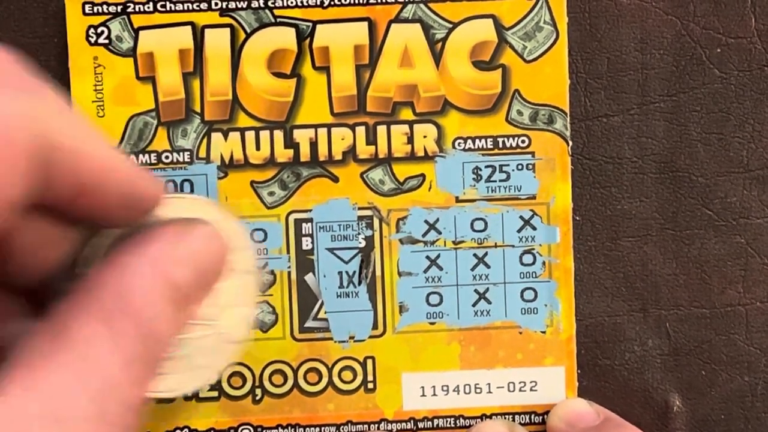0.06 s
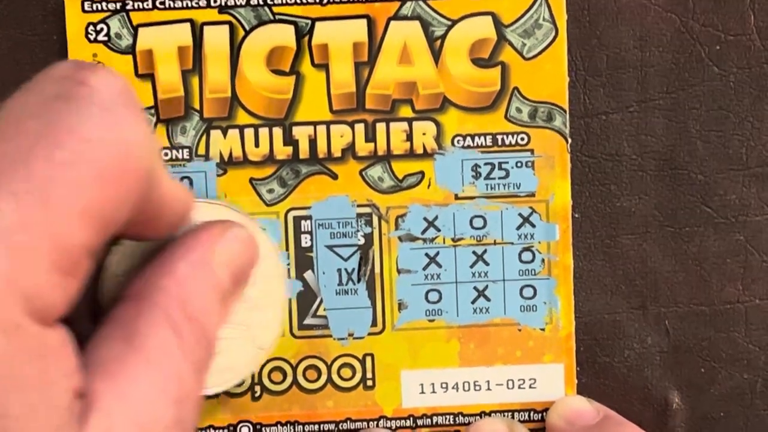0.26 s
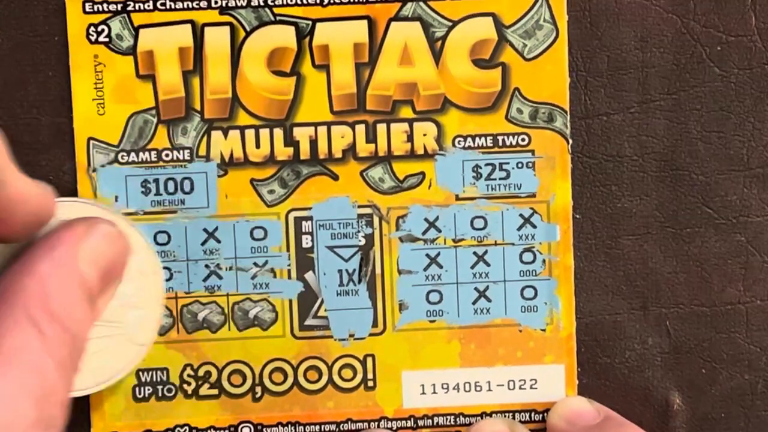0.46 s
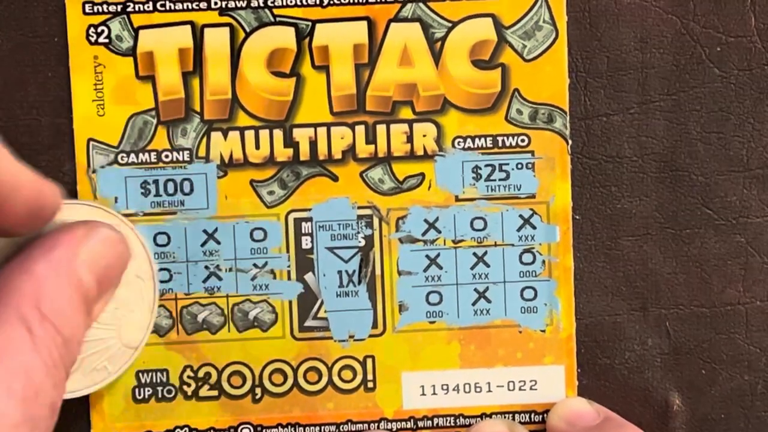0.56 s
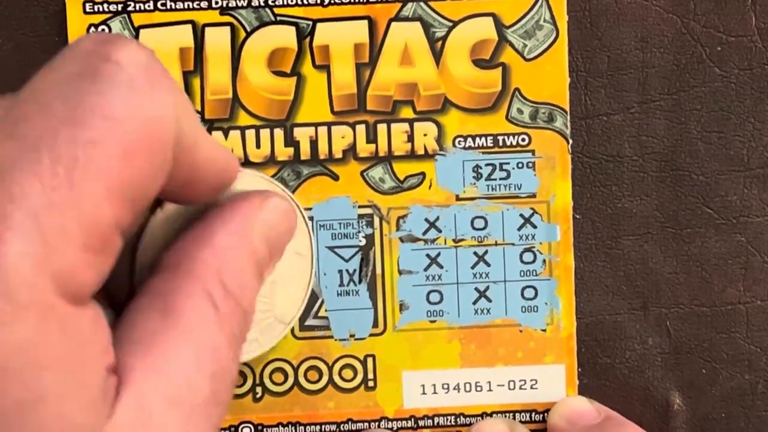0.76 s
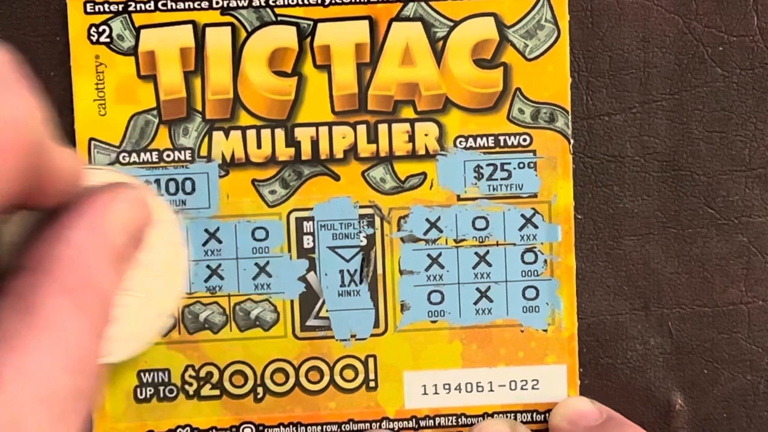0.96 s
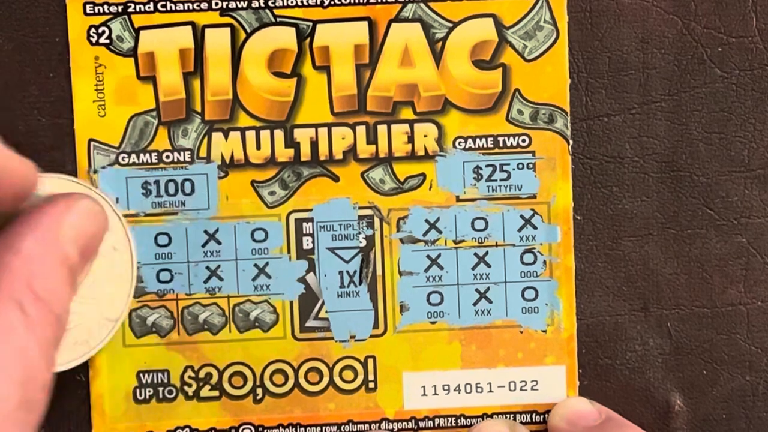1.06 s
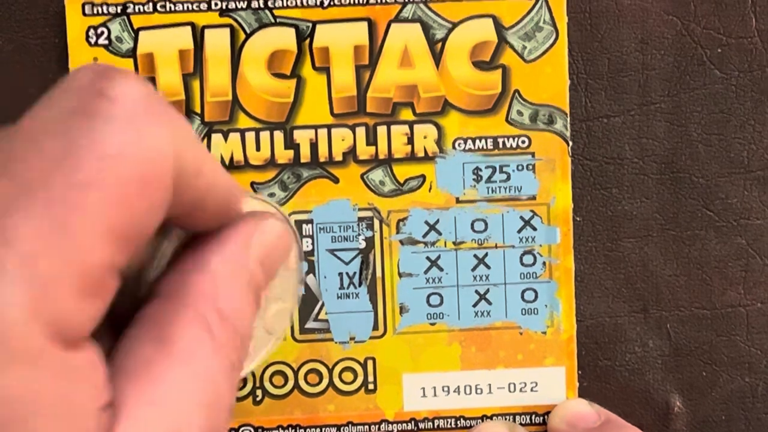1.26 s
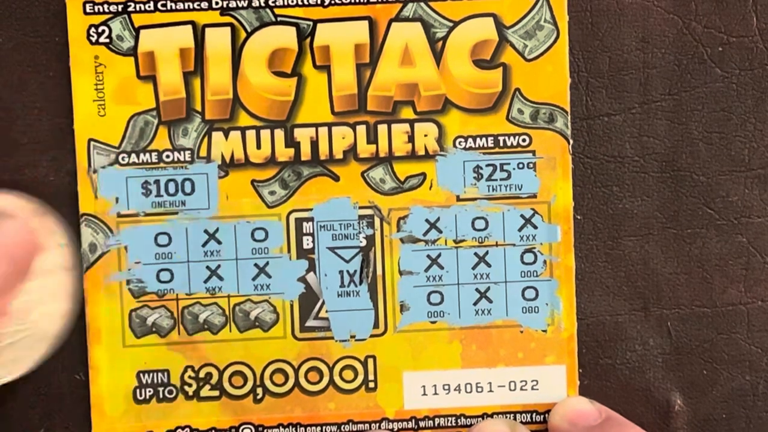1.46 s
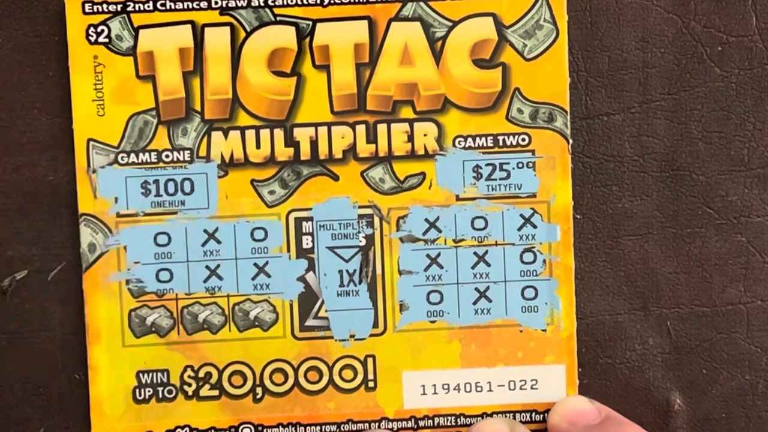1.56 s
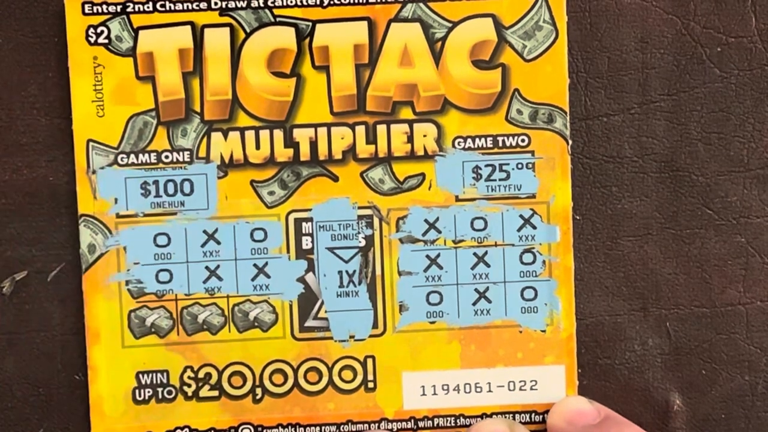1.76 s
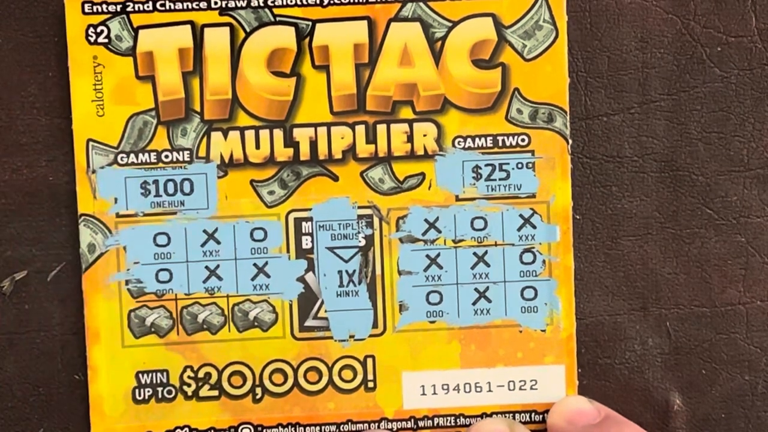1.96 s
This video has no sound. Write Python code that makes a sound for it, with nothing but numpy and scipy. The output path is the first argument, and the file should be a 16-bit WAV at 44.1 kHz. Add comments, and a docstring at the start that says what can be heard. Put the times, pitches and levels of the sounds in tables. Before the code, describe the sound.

A coin scrapes a paper ticket on a padded table in quick gritty strokes, three dull knocks landing between them, then a lighter knock and a faint slide away; close stereo microphone, small quiet room.

```python
"""A coin scratches a paper ticket on a padded table top in a small room: a soft, gritty rasp.
The scratch is dense random grains, filtered into rumble, rasp and hiss, with chirps and dry cracks on top.
Three dull knocks, where the coin lands, are force pulses spread into falling chirps, plus ringing table modes;
a lighter fourth knock follows as the coin drops off the ticket's edge and slides away.
Short noise bursts give the metal ticks; a short room tail and a quiet noise hush lie underneath."""
import sys
import numpy as np
from scipy import signal
from scipy.fft import rfft, irfft, next_fast_len
from scipy.io import wavfile

SR = 44100
rng = np.random.default_rng(int(sys.argv[2]) if len(sys.argv) > 2 else 0)


def materialize(psi):
    """Save the field psi as 16-bit PCM at rate SR to the path in sys.argv[1].

    A 1-D psi becomes a single channel; in a 2-D psi each row is a channel.
    """
    bounded = np.clip(np.atleast_2d(psi).T, -1, 1)
    quanta = np.round(bounded * 32767).astype(np.int16)
    wavfile.write(sys.argv[1], SR, quanta)


N = 88420
SIZE = next_fast_len(N + SR // 2)  # padded, so that filter tails do not wrap around
HZ = np.maximum(np.arange(SIZE // 2 + 1) * SR / SIZE, 1)
T = np.arange(N) / SR

# Slides of the coin: start t/s, end t/s, attack t/s, release t/s,
# rumble level/dB, rasp level/dB, hiss level/dB
STROKES = [(-.03, 0.159, .02, 0.09, -51.5, -57, -59.5), (0.127, 0.31, 0.0074, 0.14, -38, -50.5, -57),
           (0.244, 0.508, 0.064, 0.085, -47, -45.5, -49.5), (0.394, 0.529, 0.088, 0.038, -45.5, -47, -63),
           (0.74, 0.875, 0.013, 0.048, -38, -55.5, -64), (0.836, 0.991, 0.064, 0.059, -43.5, -50, -49.5),
           (0.928, 1.1, 0.023, 0.073, -42, -53, -59), (1.017, 1.062, 0.0033, 0.026, -55, -48, -56.5),
           (1.127, 1.153, 0.013, 0.011, -42.5, -62, -67), (1.263, 1.427, 0.0084, 0.024, -39.5, -47.5, -58),
           (1.374, 1.487, .03, .015, -43, -46.5, -56.5), (1.434, 1.469, 0.013, 0.014, -58, -42, -41.5),
           (1.47, 1.767, .11, .11, -61.5, -59, -58.5)]
# Colours of the sliding contact, shape only: f/Hz, level/dB (per Hz)
RUMBLE = [(30, -24), (70, -4), (105, -7), (138, 1), (175, -11), (280, -4), (430, -13), (600, -24.5),
          (1200, -58)]
RASP = [(200, -21.5), (500, -3), (700, -0.5), (890, 6.5), (1250, 3), (1550, 2.5), (1950, -3.5), (2300, -6),
        (3300, -20), (6000, -34)]
HISS = [(1000, -1), (2800, 5.5), (3400, -0.5), (4300, 1.5), (4750, -2), (5500, -1), (6400, 0.5),
        (7800, -3.5), (9500, -3), (11200, -6), (12500, -14), (16000, -6)]
# Resonances of the coin's rim: f/Hz, width f/Hz, level/dB
COIN_RINGS = [(4140, 85, -2), (4550, 420, -3.5), (6200, 58, -16.5), (7060, 100, -5), (8610, 117, 5)]
# Modes of the table top, also rung by the knocks: f/Hz, level/dB, t60 t/s
TABLE_MODES = [(136.6, -53.5, 0.31), (207, -66.5, 0.59), (279.6, -50, 0.32), (332.3, -33, 0.096),
               (431.5, -53, 0.046), (619.6, -43, 0.12), (720, -56, 0.12), (882, -41, 0.1),
               (1069, -42.5, 0.086), (1433, -50.5, 0.067), (1518, -51, 0.16), (2174, -47, 0.049),
               (2355, -37, 0.023), (2765, -47.5, 0.036), (3870, -50.5, 0.045)]
JUDDER_HZ, JUDDER_DB = 95, 1.73  # top rate and rms depth of the stick-slip judder
SLIDE_RING_DB, SLIDE_RING_Q = 0, 28  # how far and how sharply the table modes colour the scrape


def scraping():
    """Flakes break under the sliding coin: the table rumbles, the paper rasps, the rim hisses."""
    # the coin sticks and slips: a random wobble in level, shared by the three colours
    judder = from_db(JUDDER_DB * rms_one(cut(rng.standard_normal(N), JUDDER_HZ, "low")))

    power = np.zeros((3, N))  # overlapping strokes add in power
    for start, end, attack, release, rumble_db, rasp_db, hiss_db in STROKES:
        stroke = np.clip(np.minimum((T - start) / attack, (end - T) / release), 0, 1)
        power += (from_db([[rumble_db], [rasp_db], [hiss_db]]) * stroke) ** 2

    rim = 1 + sum(from_db(db) * resonance(hz, width) for hz, width, db in COIN_RINGS)
    modes = sum(resonance(hz, hz / SLIDE_RING_Q) for hz, _, _ in TABLE_MODES)
    table = 1 + from_db(SLIDE_RING_DB) * modes

    bodies = colour(RUMBLE) * table, colour(RASP) * table, colour(HISS) * rim
    scrape = np.zeros(N)
    for level, body in zip(np.sqrt(power), bodies):
        scrape += level * rms_one(through(grains() * judder, body))
    return scrape


GRAINS_PER_S, GRAIN_SPREAD_DB = 7000, 2.4  # flakes of coating that break away


def grains():
    """Dense tiny fractures of uneven size, at random times and of either sign."""
    sizes = from_db(GRAIN_SPREAD_DB * np.minimum(rng.exponential(1, N), 5))
    signs = rng.choice([-1, 1], N)
    return sizes * signs * (rng.random(N) < GRAINS_PER_S / SR)


# Chirps of the slipping rim: t/s, level/dB
SQUEAKS = [(.003, -53.5), (0.041, -57), (.079, -55)]
SQUEAK_HZ, SQUEAK_WIDTH_HZ = 5540, 620  # width of each of two stacked resonances
SQUEAK_S = 0.0061  # from the peak to 1/e


def squeaks():
    """Brief chirps of the rim on the smooth coating: narrow-band noise in bell-shaped swells."""
    envelope = sum(from_db(db) * np.exp(-((T - s) / SQUEAK_S) ** 2) for s, db in SQUEAKS)
    band = resonance(SQUEAK_HZ, SQUEAK_WIDTH_HZ) ** 2
    return envelope * rms_one(through(rng.standard_normal(N), band))


# Larger flakes snapping off: t/s, level/dB
SNAPS = [(.783, -50), (.99, -51), (1.016, -47.5), (1.084, -55.5), (1.3063, -45)]


def snaps():
    """Tiny dry cracks in the coating: decaying noise in the colour of the hiss."""
    return splashes(SNAPS, 0.027, HISS)


# Blows of the coin on the table: t/s, level/dB, hardness f/Hz (low-pass), bass cut f/Hz,
# mode ringing level/dB (on top of the blow), metal tick level/dB, tick top f/Hz
KNOCKS = [(0.1423, 16, 2690, 78, 0.5, -6.5, 17200), (0.7523, 14.5, 2040, 76, -1, -7.5, 14900),
          (1.2787, 16, 3130, 73.5, 1.5, -3.5, 8080), (1.4759, 8, 1520, 253, 5.5, -14, 10030)]
# Bending wave that a blow sends through the table top: f/Hz, level/dB
THUD = [(40, -41.5), (80, -11.5), (125, -10), (180, -17), (290, 2.5), (450, -1.5), (600, -16), (950, -9.5),
        (1250, -17), (1600, -13.5), (2400, -27), (3300, -35), (6000, -45), (9000, -51), (12000, -68)]
# Reflections from the table's edges and the walls: delay t/s, level/dB, top f/Hz
ECHOES = [(.00557, -15.5, 132), (.00708, -14, 6200), (0.0114, -12.5, 6000), (0.0201, -22, 790),
          (.03099, -19.5, 1260), (0.0322, -22.5, 1620), (.03944, -27, 2000)]
THUD_DB = 17  # added to the thud's colour


def knocks():
    """Each blow sends a bending wave through the table, which echoes and leaves its modes ringing."""
    _, level_db, _, _, ringing_db, *_ = np.transpose(KNOCKS)
    paths = 1  # the direct wave
    for delay_s, db, top_hz in ECHOES:
        delay = np.exp(-2j * np.pi * HZ * delay_s)
        paths = paths + from_db(db) * delay / (1 + 1j * HZ / top_hz)
    wave = through(blows(level_db), from_db(THUD_DB) * colour(THUD) * paths)

    drive = blows(level_db + ringing_db)
    ringing = sum(from_db(db) * ring(drive, hz, t60) for hz, db, t60 in TABLE_MODES)
    return wave + ringing


SPREAD_S, SPREAD_HZ = 0.00257, 305.6  # the wave's delay at this frequency; higher arrives sooner


def blows(levels_db):
    """Force pulses, softened by the paper and spread into falling chirps by the table top."""
    force = np.zeros(N)
    for db, (s, _, hard_hz, bass_hz, *_) in zip(levels_db, KNOCKS):
        soft_pulse = cut(click(s), hard_hz, "low")
        force += from_db(db) * cut(soft_pulse, bass_hz, "high")
    # delay falls with the square root of frequency
    spread = np.exp(-4j * np.pi * SPREAD_S * np.sqrt(SPREAD_HZ * HZ))
    return through(-force, spread)


# Ring of the coin and snap of the paper: f/Hz, level/dB
TICK = [(2000, 14), (3750, -11.5), (4400, -10.5), (5900, -1.5), (8000, -7), (10500, -9), (13000, -9.5),
        (16000, -2.5)]
TICK_DB, TICK_T60_S = -17.5, .05  # offset on each tick's level; decay by 60 dB


def ticks():
    """Noise splashes as metal meets paper, each with its own top as the coin meets it at its own angle."""
    total = np.zeros(N)
    for s, *_, db, top_hz in KNOCKS:
        splash = splashes([(s, db)], TICK_T60_S, TICK)
        total += cut(splash, top_hz, "low")
    return from_db(TICK_DB) * total


# Colour of the room tail: f/Hz, level/dB
ROOM_COLOUR = [(80, 2), (300, 3.4), (700, 9), (1500, 4.4), (3000, 2.6), (10000, 8.6)]
ROOM_DB, ROOM_T60_S, ROOM_BUILD_S = -21.5, .3, 0.001  # level before colouring, decay, build-up


def room(x):
    """Short diffuse tail of a furnished room: convolution with decaying noise."""
    decay = from_db(-60 * T / ROOM_T60_S)
    tail = rng.standard_normal(N) * decay * (1 - np.exp(-T / ROOM_BUILD_S))
    response = rfft(rms_one(tail) / np.sqrt(N), SIZE)  # unit energy
    return from_db(ROOM_DB) * through(x, response * colour(ROOM_COLOUR))


# Hush of the still room, shape only: f/Hz, level/dB (per Hz)
FLOOR = [(15, -30), (25, -4), (44, -5.5), (66, 0), (81, -14), (207, -7), (301, -12), (558, -15.5),
         (637, -19.5), (749, -14), (1180, -20.5), (2070, -21), (2300, -26), (7890, -36.5), (15000, -50)]
FLOOR_DB = -55.5  # before the ports


def still_room():
    """Two independent layers of steady coloured noise: the common hush and its stereo side."""
    noise = rng.standard_normal((2, N))
    return from_db(FLOOR_DB) * rms_one(through(noise, colour(FLOOR)))


# Difference between the two microphone ports: f/Hz, left minus right level/dB, left lead phase/rad
PORTS = [(190, 0, 0), (240, -2.1, -.1), (340, -1.8, -.1), (390, -4, -.1), (460, -2.3, .1), (540, -4.5, .1),
         (610, -.5, .5), (660, -1, -.2), (740, 2.2, -.6), (790, -4.5, -.7), (840, -8.5, 0), (900, -1, .7),
         (960, -1.5, .8), (1050, -3, .1), (1250, -.8, .3), (1400, -1.8, 0), (1900, -.3, .04),
         (3500, 0, .12), (7300, 0, -.1), (9000, 0, -1.1), (10400, 0, -1.7), (12500, 0, -2.7),
         (14000, 0, -2.85)]
PORT_HZ, PORT_WIDTH_HZ = 5020, 300  # a narrow resonance turns the phase of the left port


def ports(x):
    """The sound reaches each port with its own level and phase, half the difference on each side."""
    level = from_db(over_hz([(hz, db) for hz, db, _ in PORTS]) / 2)
    turn = np.exp(.5j * over_hz([(hz, radians) for hz, _, radians in PORTS]))
    all_pass = 1 - 2 * resonance(PORT_HZ, PORT_WIDTH_HZ)
    left = level * turn * all_pass
    right = 1 / (level * turn)
    return through(x, np.array([left, right]))


def splashes(hits, t60, spectrum):
    """Bursts of coloured noise that start at once and decay by 60 dB in t60 seconds."""
    envelope = sum((T >= s) * from_db(db - 60 * np.maximum(T - s, 0) / t60) for s, db in hits)
    body = colour(spectrum)
    unit_body = body / np.sqrt(np.mean(abs(body) ** 2))
    return through(envelope * rng.standard_normal(N), unit_body)


def click(s):
    """A unit click at a given time."""
    return 1. * (np.arange(N) == int(s * SR))


def ring(x, hz, t60):
    """A two-pole resonator: a unit click sets a decaying sine of about height 1 ringing."""
    radius = 10 ** (-3 / (t60 * SR))
    angle = 2 * np.pi * hz / SR
    feedback = [1, -2 * radius * np.cos(angle), radius ** 2]
    return signal.lfilter([0, np.sin(angle)], feedback, x + 1e-18)


def resonance(hz, width_hz):
    """Frequency response of one resonance, gain 1 on top."""
    return 1 / (1 + 1j * (HZ ** 2 - hz ** 2) / (HZ * width_hz))


def from_db(db):
    """Decibels to gain."""
    return 10 ** (np.asarray(db) / 20)


def rms_one(x):
    """Scale to rms 1."""
    return x / np.sqrt(np.mean(x ** 2) + 1e-20)


def over_hz(points):
    """Read a table on a log-frequency axis."""
    hz, value = np.transpose(points)
    return np.interp(np.log(HZ), np.log(hz), value)


def through(x, response):
    """Pass a sound through a frequency response."""
    return irfft(rfft(x, SIZE) * response, SIZE)[..., :N]


def colour(points):
    """Causal (minimum-phase) response with the given dB curve."""
    cepstrum = irfft(np.log(from_db(over_hz(points))), SIZE)[:SIZE // 2]
    return np.exp(rfft(2 * cepstrum, SIZE) - cepstrum[0])


def cut(x, hz, kind, order=2):
    """Butterworth low- or high-pass."""
    sos = signal.butter(order, np.clip(hz, 10, .45 * SR), kind, fs=SR, output="sos")
    return signal.sosfilt(sos, x + 1e-18)


FLOOR_SIDE_DB = -18.5  # the part of the hush that differs between the ports


def scene():
    """Strokes and knocks, a little to the right, over the still room."""
    thuds = knocks()
    coin = scraping() + squeaks() + snaps() + thuds + ticks() + room(thuds)
    hush, side = still_room()
    opposite = np.array([[1], [-1]])
    return ports(coin + hush) + from_db(FLOOR_SIDE_DB) * side * opposite


def record(dry):
    """The lowest bass and the top are cut."""
    # 70 dB down from 17.1 kHz upwards
    top_cut = signal.cheby2(12, 70, 17100, fs=SR, output="sos")
    return signal.sosfilt(top_cut, cut(dry, 28, "high"))


dry = scene()
out = record(dry)
materialize(out)
```